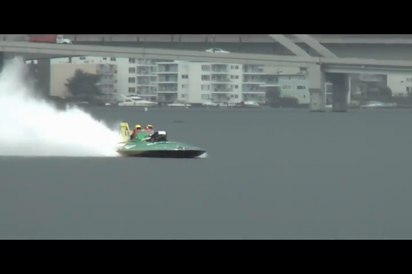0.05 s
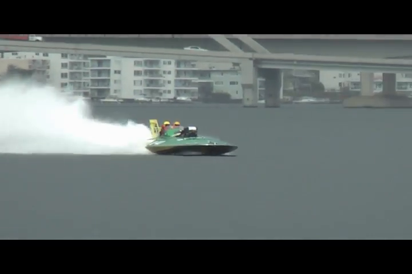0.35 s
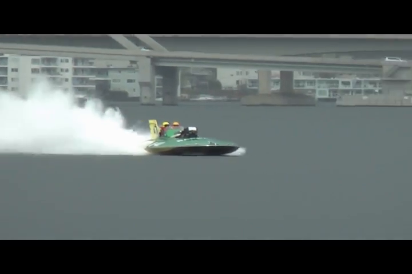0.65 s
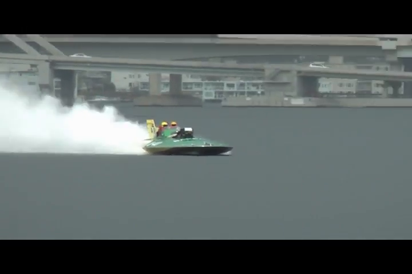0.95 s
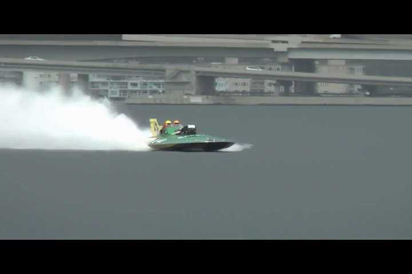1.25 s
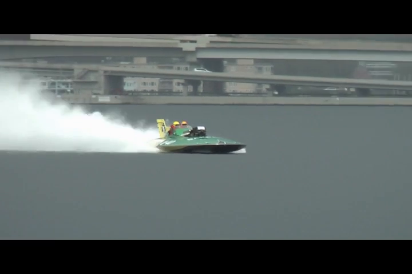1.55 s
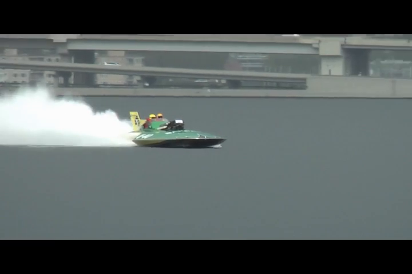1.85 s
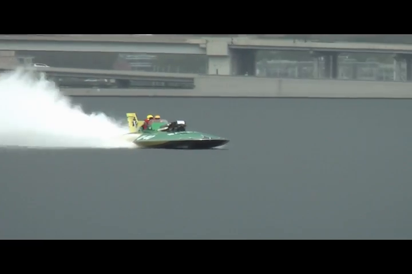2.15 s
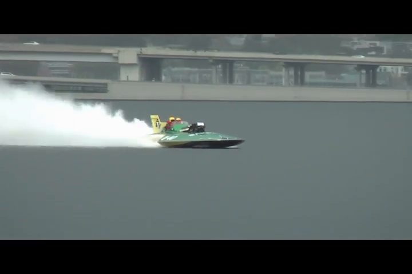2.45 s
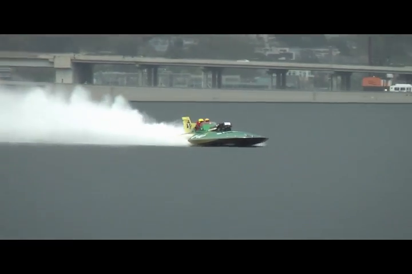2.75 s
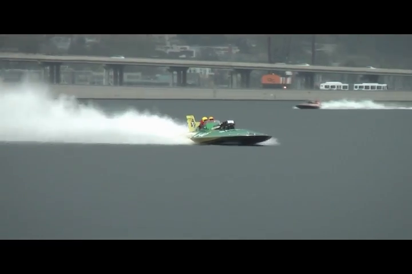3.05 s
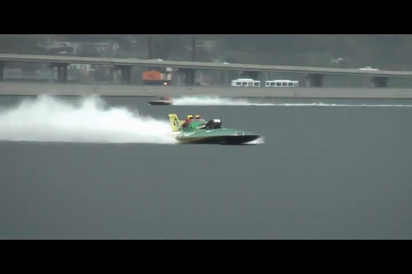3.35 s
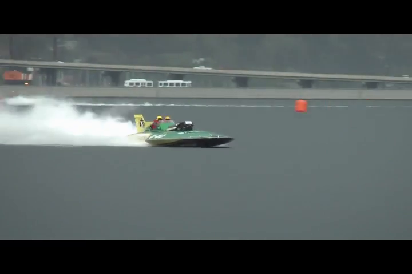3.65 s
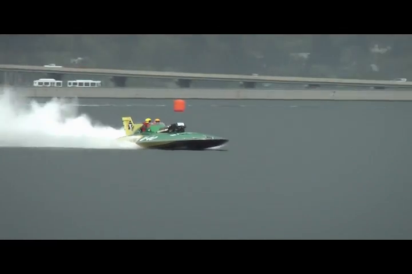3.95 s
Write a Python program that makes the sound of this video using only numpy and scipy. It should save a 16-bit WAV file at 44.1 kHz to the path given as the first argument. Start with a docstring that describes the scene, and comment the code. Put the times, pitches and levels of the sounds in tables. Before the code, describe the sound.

A racing boat's engine drones across open water, with rasping exhaust and steady spray hiss. It runs raggedly with brief stumbles for the first two seconds, then smooths out. The pitch sinks until about 3.1 seconds, climbs until 3.6, then eases again. Small dry ticks sound close by from 0.8 seconds onward. Light wind rumbles on the microphone, with one short gust near 3.7 seconds.

```python
"""A racing hydroplane out on open water, heard from the shore on a two-port microphone.
At first its twelve-cylinder piston engine drones raggedly under exhaust roar and the hiss of spray.
The speed sags for about three seconds, then the engine revs up again with a cleaner note.
Close to the microphone, a few small ticks and light wind, with one short gust near the end."""
import sys
import numpy as np
from scipy.fft import rfft, irfft, next_fast_len
from scipy.io import wavfile
from scipy.ndimage import map_coordinates

SR = 44100
rng = np.random.default_rng(int(sys.argv[2]) if len(sys.argv) > 2 else 0)


def master(y):
    """Save y as 16-bit WAV."""
    cut = np.clip(np.atleast_2d(y).T, -1, 1)
    pcm = np.round(cut * 32767)  # scale
    wavfile.write(sys.argv[1], SR, pcm.astype(np.int16))


N = 176400
TIME = np.arange(N) / SR
HZ = np.fft.rfftfreq(next_fast_len(N + 8192), 1 / SR)
BANK_CYLINDERS = 6


def engine():
    """The engine out on the water: speed and effort drive both the drone and the exhaust."""
    # Firing note of one cylinder bank: time_s, firing_hz, level_db
    firing_note = [(0, 196.2, -16), (.14, 191.7, -16), (.27, 187.9, -13), (.41, 201.7, -13),
                   (.5, 199.4, -15.5), (.58, 194.6, -14), (.69, 196.5, -13.5), (.8, 201.2, -21),
                   (.91, 198.5, -14.5), (1.04, 196.4, -17), (1.14, 193.1, -16.5), (1.26, 177.1, -13.5),
                   (1.36, 179.2, -20.5), (1.46, 180.3, -14), (1.61, 179.8, -13), (1.72, 175.3, -15.5),
                   (1.84, 169.5, -15), (1.93, 169.6, -13.5), (2.03, 162.6, -19), (2.19, 151.4, -13.5),
                   (2.33, 158.1, -11), (2.42, 158.8, -12), (2.57, 149.8, -17), (2.83, 147.8, -18),
                   (2.96, 144.4, -15.5), (3.1, 134.3, -20), (3.22, 144.1, -14.5), (3.35, 157.5, -11.5),
                   (3.5, 166.2, -11.5), (3.61, 170.5, -12), (3.77, 160.7, -8.5), (3.9, 153.2, -15),
                   (4, 149.9, -10.5)]
    # How the engine runs: time_s, effort_db, raggedness (0-1), rasp_db
    running = [(0, 1.5, 0.5, 1.5), (.3, -1.5, 0.98, 2), (.7, -2, 1, 0), (1.0, -0.5, 0.96, 3.5),
               (1.15, 0, 0.86, 1.5), (1.28, -0.5, 0.7, -2.5), (1.37, -3, 0.87, -2.5), (1.65, 0, 0.32, -1),
               (2.0, -1, 0.5, -3), (2.4, -2.5, 0, -5), (2.7, -1, 0.03, -5.5), (3.1, -3.5, .2, -8),
               (3.3, 0, .05, -7), (3.6, 1, 0, -4.5), (3.8, -1, 0.07, -6.5), (4, -2, 0.11, -5.5)]
    firing_hz, note_db = curves(firing_note)
    effort_db, ragged, rasp_db = curves(running)
    drop_db = stumbles()
    note_db = note_db + 0.5 - drop_db
    effort_db = effort_db - 0.31 * drop_db  # the other tones and the throb dip less deeply
    speed_jitter = 0.004 * wobble(20)
    cycle = np.cumsum(firing_hz * (1 + speed_jitter)) / BANK_CYLINDERS / SR  # engine cycles so far
    tones = drone(cycle, note_db, effort_db, ragged)
    return tones + exhaust(cycle, effort_db, ragged, rasp_db) + blare(cycle)


def drone(cycle, note_db, effort_db, ragged):
    """The firing note and the tones of unequal cylinders; ragged running makes them flutter more."""
    # Tones at multiples of the engine cycle: order, ragged_db, clean_db
    orders = [(2, -34.5, -56), (3, -23.5, -39), (4, -24, -36.5), (5, -22.5, -25.5), (7, -25, -27.5),
              (8, -26, -33.5), (9, -26, -20.5), (10, -27.5, -34), (11, -29.5, -33), (12, -37, -31.5),
              (14, -40.5, -34.5), (15, -42, -29.5), (16, -36, -35), (17, -48, -36), (20, -42, -37.5),
              (24, -42, -42), (27, -35.5, -45), (30, -41, -42)]
    # Swells and dips of single tones: time_s, order, half_length_s, gain_db
    swells = [(1.2, 9, 0.13, 3.5), (1.4, 11, .25, 5), (0.91, 30, .12, 6), (1.4, 9, 0.17, 1),
              (2.727, 9, 0.49, -2.5), (3.53, 9, 0.33, 3.5), (7.3, 16, .15, 7), (3.58, 3, .15, 12.5),
              (3.9, 7, 0.28, 4.5), (7.2, 5, .25, 3.5)]
    unrest = 0.5 + 0.69 * ragged
    note_gain = amp(note_db + 2 * unrest * wobble(32))
    out = note_gain * np.sin(2 * np.pi * BANK_CYLINDERS * cycle + 0.3 * unrest * wobble(30))
    for order, ragged_db, clean_db in orders:
        swell_db = sum(db * bell(TIME, s, half_s) for s, k, half_s, db in swells if k == order)
        level_db = effort_db + ragged * ragged_db + (1 - ragged) * clean_db + swell_db - 0.5
        smear_rad = 0.07 * order * wobble(26)
        flutter_db = 2.5 * unrest * wobble(17)
        phase = 2 * np.pi * (order * cycle + rng.random())
        out += amp(level_db + flutter_db) * np.sin(phase + smear_rad)
    return np.sqrt(2) * out


def stumbles():
    """The engine stumbles: how far its firing note drops at each moment, in dB."""
    # Brief drop-outs: time_s, depth_db
    dropouts = [(0.042, 15.5), (.105, 9), (.38, 10), (.775, 6.5), (.97, 5), (1.21, 22), (1.355, 17),
                (1.5, 11), (1.58, 6), (1.825, 11.5), (1.965, 8.5), (2.38, 6), (2.735, 8.5), (2.845, 11),
                (3.055, 6)]
    return sum(db * bell(TIME, s, half_width=0.017) for s, db in dropouts)


def firings(cycle):
    """One impulse of random strength each time a cylinder of the bank fires."""
    return np.diff(np.floor(BANK_CYLINDERS * cycle), prepend=0) * rng.standard_normal(N)


def exhaust(cycle, effort_db, ragged, rasp_db):
    """Uneven firings throb in the pipes; random puffs and a snarl repeating each cycle make the rasp."""
    # Low throb of the pipes: frequency_hz, density_db
    throb_spectrum = [(30, -74), (48, -62.5), (65, -50), (95, -49), (130, -37), (165, -35), (215, -46.5),
                      (270, -41), (350, -45), (450, -49.5), (600, -63), (1000, -82.5), (2000, -120)]
    # Midrange rasp of the exhaust: frequency_hz, density_db
    rasp_spectrum = [(200, -80), (400, -54.5), (560, -53), (720, -54), (900, -56), (1150, -61.5),
                     (1450, -62.5), (1900, -66), (2300, -73), (3000, -82.5), (3600, -75), (4500, -82.5),
                     (8000, -115)]
    throb = coloured(firings(cycle) + 0.041 * noise(), throb_spectrum)
    throb *= amp(effort_db - 3.5 * (1 - ragged))  # softer when the engine runs clean
    pulse_db = 2.3 * np.cos(2 * np.pi * BANK_CYLINDERS * cycle) + np.cos(2 * np.pi * cycle)
    puffs = noise() * amp(pulse_db)
    pattern = rng.standard_normal(1200)
    snarl = np.interp(cycle % 1 * len(pattern), np.arange(len(pattern)), pattern)
    snarl *= amp(2.1 * wobble(25.06))
    rasp = amp(-2) * coloured(puffs, rasp_spectrum) + amp(-4.5) * coloured(snarl, rasp_spectrum)
    return throb + rasp * amp(rasp_db + 0.16 * wobble(13))


def blare(cycle):
    """Uneven firings ring one narrow resonance of the pipes while the engine labours."""
    # Strength of the pipe resonance: time_s, level_db
    levels = [(0, -41), (.4, -29), (1.0, -27), (1.4, -23), (1.6, -21), (1.9, -23), (2.03, -32), (2.22, -25),
              (2.35, -41), (3.1, -48), (3.24, -24), (3.4, -45), (4, -50)]
    level_db, = curves(levels)
    ringing = filtered(firings(cycle), bell(HZ, 356, half_width=32))
    return unit(ringing) * amp(level_db)


def howl():
    """A hollow resonance drifts through the exhaust roar."""
    # Path of the howl: time_s, pitch_hz, level_db
    track = [(0, 872.7, -37), (.65, 850, -41.5), (1.0, 1018, -32.5), (1.3, 816, -44), (1.6, 800, -33),
             (2.1, 674.5, -40), (2.35, 719.4, -38), (2.5, 805, -35), (2.68, 700.5, -34.5),
             (2.78, 808, -31.5), (2.95, 820, -44.5), (3.35, 696, -43), (3.6, 702.4, -34),
             (3.72, 717, -55.5)]
    return resonance(track, half_width_hz=68)


def whistle():
    """A thin, breathy whistle over the engine."""
    # Path of the whistle: time_s, pitch_hz, level_db
    track = [(0, 3720, -49), (.5, 3600, -55), (.8, 3620, -55), (1.0, 3890, -51), (1.2, 3675, -58),
             (1.9, 3600, -57.5), (2.9, 3640, -60.5), (3.35, 3860, -51)]
    return resonance(track, half_width_hz=280)


def spray():
    """Water thrown up by the boat: an even, finely grained hiss with a sparse crackle."""
    # Hiss of the spray: frequency_hz, density_db
    spectrum = [(300, -65), (1000, -69.5), (2000, -74.5), (2550, -73.5), (2850, -75), (2970, -73),
                (3250, -75), (3600, -76), (3950, -74.5), (4200, -75), (4500, -75), (4900, -79.5),
                (5420, -82), (5650, -84), (6800, -91), (7100, -91), (8000, -100.5), (8500, -112)]
    clicks_per_s, crackle_db = 41, -12.5
    grain = noise() * amp(1.3 * wobble(200))
    hiss = coloured(grain, spectrum) * amp(0.3 * wobble(2.1))
    clicks = (rng.random(N) < clicks_per_s / SR) * noise()
    return hiss + amp(crackle_db) * coloured(clicks, spectrum)


def whine():
    """A narrow high sizzle and a few faint, slightly wavering tones in the hiss."""
    # Strength of the sizzle: time_s, level_db
    sizzle_levels = [(0, -61), (1.6, -67), (2.1, -49.5), (3, -58), (3.5, -53.5), (4, -58)]
    # Faint tones: pitch_hz, level_db
    faint_tones = [(1603, -55), (2681, -58), (2960, -57), (5425, -68)]
    level_db, = curves(sizzle_levels)
    sizzle = unit(filtered(noise(), bell(HZ, 5350, half_width=130))) * amp(level_db)
    tones = sum(amp(db) * np.sin(2 * np.pi * hz * TIME + 2 * wobble(22)) for hz, db in faint_tones)
    return sizzle + np.sqrt(2) * tones


def ticks():
    """Small dry pops close to the microphone, each swelling and dying within milliseconds."""
    # Close ticks: start_s, peak_db, pitch_hz, rise_s
    pops = [(.8271, -18.5, 3410, 0.00028), (0.8488, -18.5, 3440, .00017), (1.2104, -27.5, 5570, 0.00041),
            (1.4826, -25.5, 2350, 0.0014), (1.686, -29, 5140, 0.0006), (2.3643, -25, 5270, 0.00027),
            (2.3946, -18, 3560, 0.00016), (2.4458, -26.5, 5200, .00022), (2.9865, -22, 2750, 0.00051),
            (3.3694, -22.5, 2750, 0.00033), (3.872, -21, 3210, .00017), (3.9498, -19.5, 2750, 0.00049)]
    out = np.zeros(N + SR)
    t = np.arange(SR // 50) / SR
    for start_s, peak_db, pitch_hz, rise_s in pops:
        envelope = amp(peak_db) * t / rise_s * np.exp(1 - t / rise_s)
        out[round(start_s * SR):][:len(t)] += envelope * np.sin(2 * np.pi * pitch_hz * t)
    return out[:N]


def wind():
    """Light wind rumbles on the microphone, with one short gust."""
    # Wind rumble: frequency_hz, density_db
    spectrum = [(15, -67), (35, -71), (60, -65.5), (150, -76), (500, -120)]
    gust_db = 15 * bell(TIME, 3.67, half_width=0.05)
    return coloured(noise(), spectrum) * amp(gust_db + 0.98 * wobble(4.9))


def left_port(direct, diffuse):
    """The left port of the microphone hears the shore weaker, shifted in phase and partly diffuse."""
    # Left level against right: frequency_hz, gain_db
    balance = [(60, -4.6), (400, -4.5), (800, -6.8), (1200, -11), (1400, -10.5), (1650, -15), (2300, -7),
               (3000, -7.5), (3500, -11.5), (4000, -7), (4700, -4.5), (5600, -5.5), (8000, -3.5)]
    # Left phase against right: frequency_hz, lead_rad
    lead = [(0, -0.65), (1300, 0.11), (1500, 1.5), (1800, 1.66), (2200, 2), (3000, 2), (3500, 1),
            (3900, -2.5), (4300, -3), (5300, -4.5), (6400, -4.5), (7500, -13)]
    # Likeness of the two ports: frequency_hz, likeness (0-1)
    likeness = [(400, 1), (900, 0.99), (1350, 1), (1600, 0.05), (2000, 0.58), (3400, 0.6), (3650, 0.61),
                (3950, 0.89), (5400, 1), (6700, 0.32), (8000, 1)]
    alike = np.clip(along(likeness), 0, 1)
    response = amp(along(balance)) * np.exp(1j * along(lead))
    return filtered(direct, response * alike) + filtered(diffuse, response * np.sqrt(1 - alike ** 2))


def amp(db):
    """Decibels to gain."""
    return 10 ** (np.asarray(db) / 20)


def unit(x):
    """Scale to rms 1."""
    return x / np.sqrt(np.mean(x ** 2) + 1e-20)


def bell(axis, centre, half_width):
    """A Gaussian bump of height 1 in time or frequency."""
    return np.exp(-((axis - centre) / half_width) ** 2)


def along(points):
    """Rows of frequency and value, joined on a log axis."""
    hz, values = np.transpose(points)
    return np.interp(np.log(HZ + 1), np.log(hz + 1), values)


def curves(rows):
    """One value per sample for each column after the time."""
    times, *columns = np.transpose(rows)
    return [np.interp(TIME, times, column) for column in columns]


def wobble(knots_per_s):
    """A smooth random curve."""
    return map_coordinates(rng.standard_normal(1024), [TIME * knots_per_s + 2], mode="wrap")


def noise():
    """Two unrelated white noises: one direct, one diffuse."""
    return rng.standard_normal((2, N))


def filtered(x, response):
    """Apply a frequency response given at HZ."""
    size = 2 * (len(HZ) - 1)
    return irfft(rfft(x, size) * response, size)[..., :N]


def coloured(x, spectrum):
    """Give a white signal a spectrum in dB per Hz."""
    return filtered(unit(x), amp(along(spectrum)) * np.sqrt(SR / 2))


def resonance(track, half_width_hz):
    """Narrow noise whose centre and level follow a track."""
    centre_hz, level_db = curves(track)
    in_phase, quadrature = filtered(noise(), bell(HZ, 0, half_width_hz))
    phase = 2 * np.pi * np.cumsum(centre_hz) / SR
    return unit(in_phase * np.cos(phase) + quadrature * np.sin(phase)) * amp(level_db)


def scene():
    """The boat offshore, wind and ticks close by; the right port hears everything in full."""
    direct, diffuse = howl() + whistle() + engine() + spray() + whine() + wind() + ticks()
    return np.array([left_port(direct, diffuse), direct])


def record(dry):
    """The recorder rounds off peaks at full scale and keeps nothing above its band limit."""
    band_limit_hz = 8450
    rounded = dry / (1 + np.abs(dry) ** 8) ** (1 / 8)
    return filtered(rounded, HZ < band_limit_hz)


dry = scene()
out = record(dry)
master(out)
```